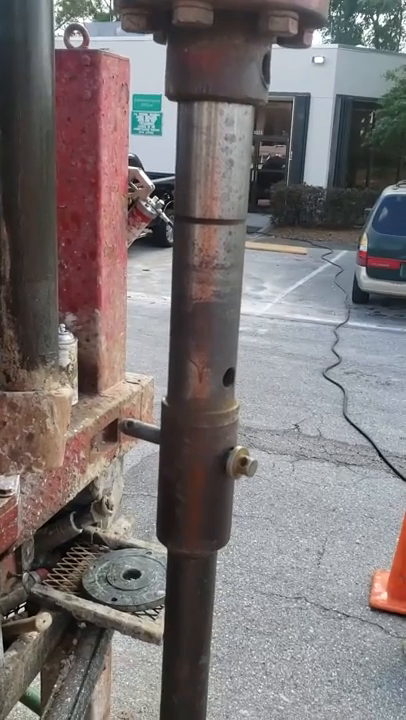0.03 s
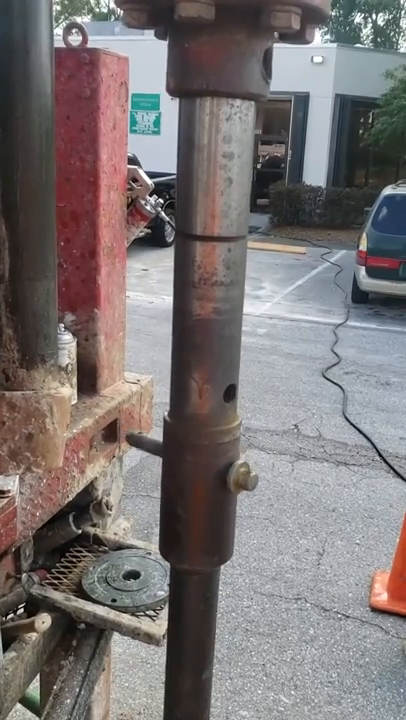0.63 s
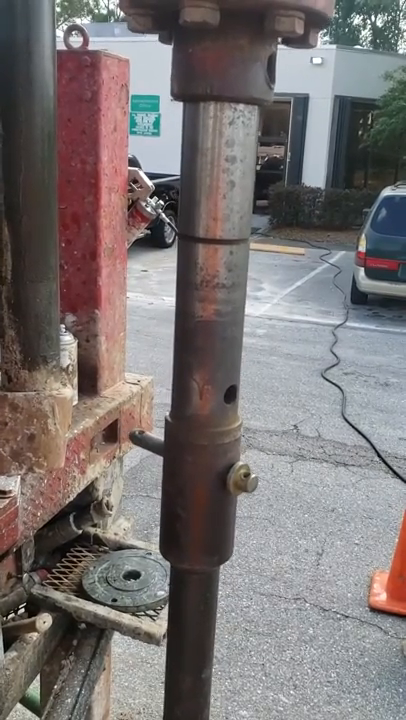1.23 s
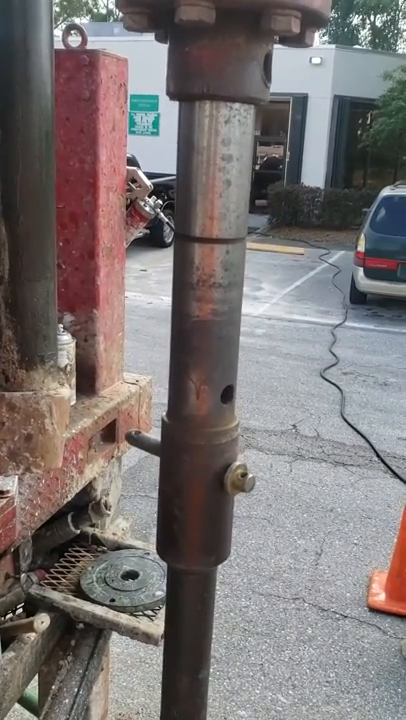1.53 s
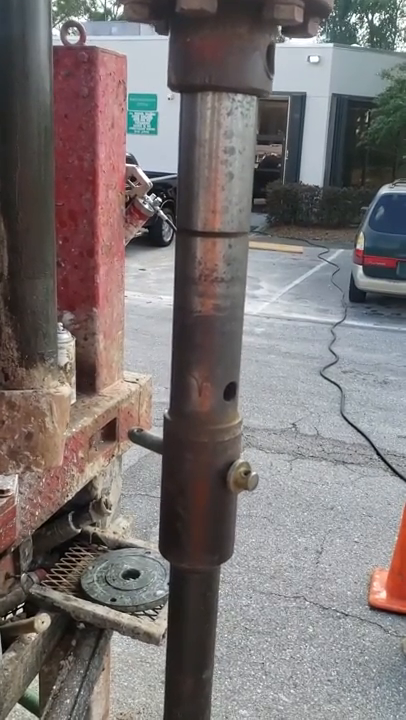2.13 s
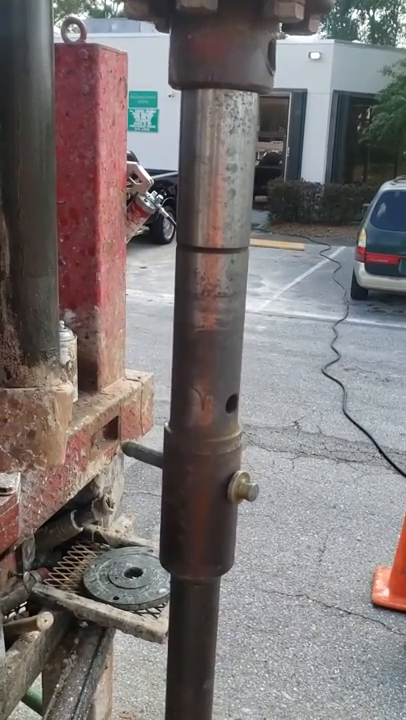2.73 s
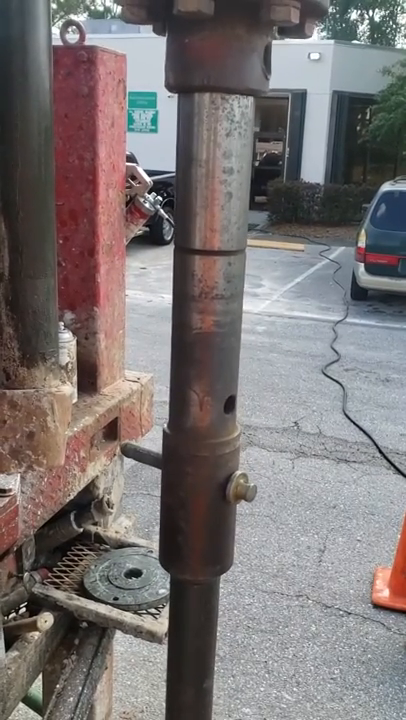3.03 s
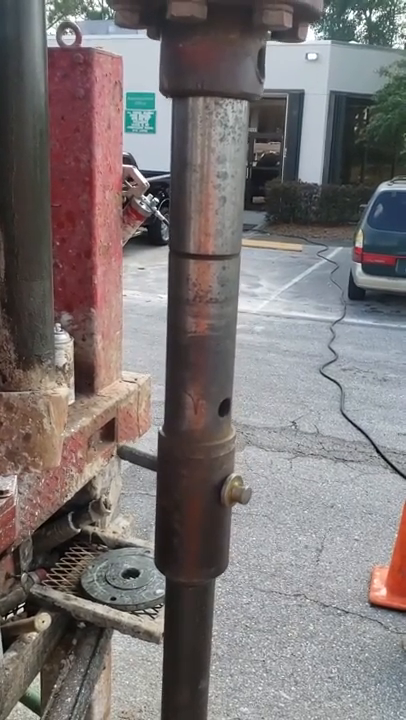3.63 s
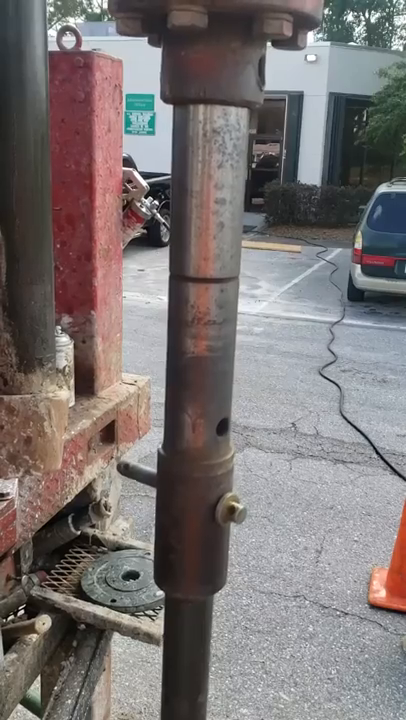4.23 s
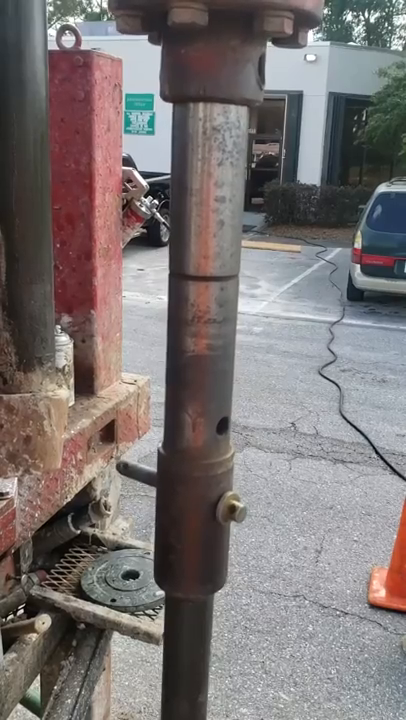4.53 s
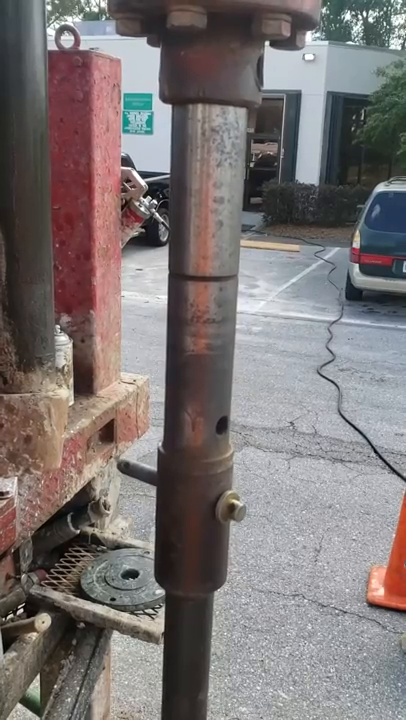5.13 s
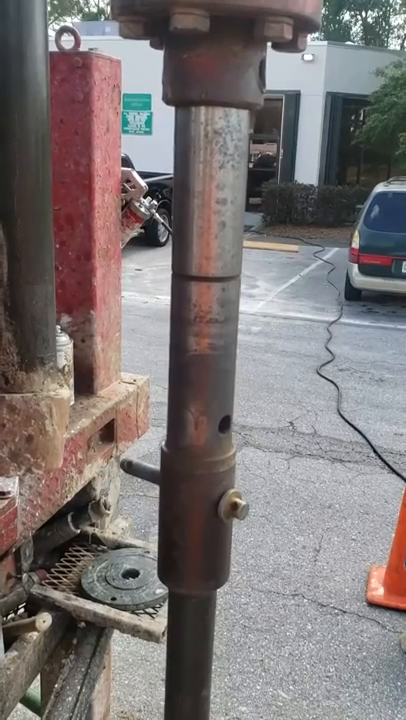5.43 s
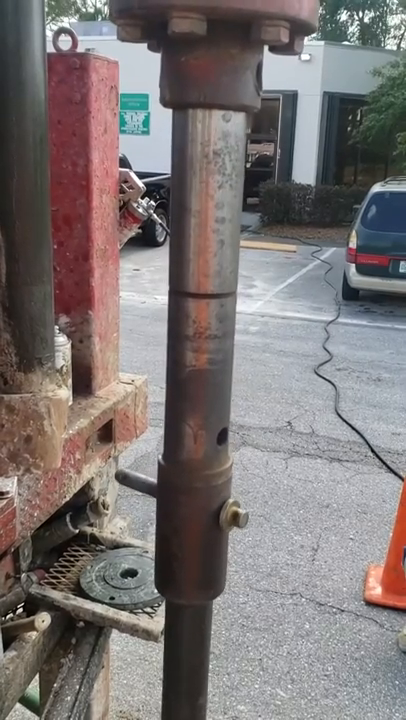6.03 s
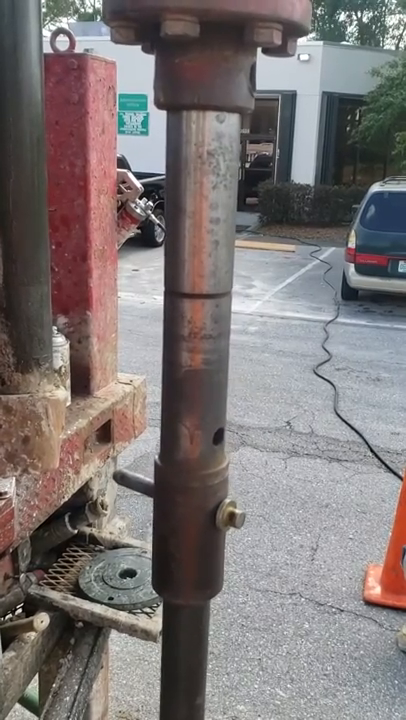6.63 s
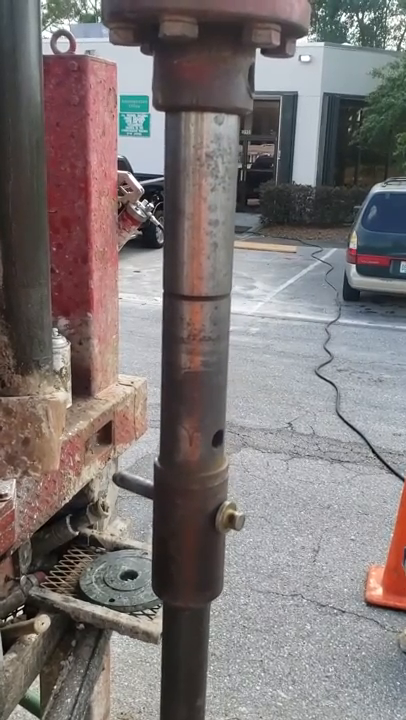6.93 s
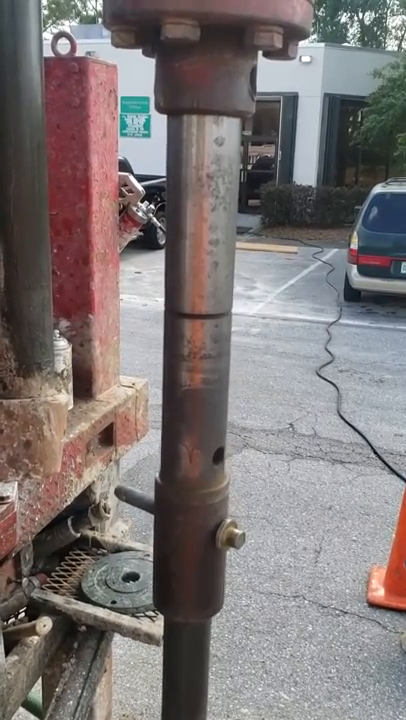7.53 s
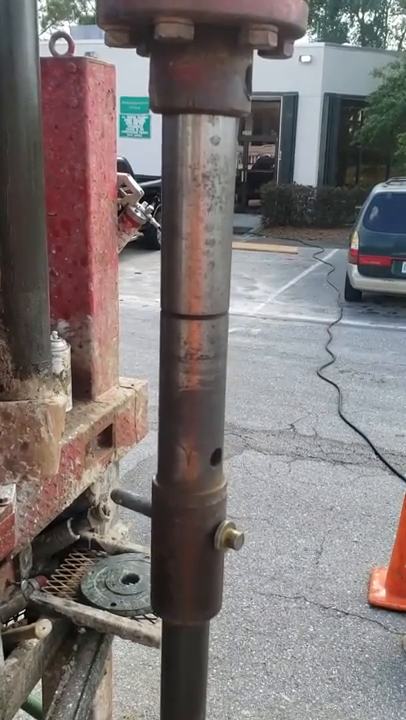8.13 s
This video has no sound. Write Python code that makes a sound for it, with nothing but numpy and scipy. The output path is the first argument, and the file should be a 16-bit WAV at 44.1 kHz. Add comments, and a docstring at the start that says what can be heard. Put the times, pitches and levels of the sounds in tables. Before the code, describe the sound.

Five loud, evenly paced hammer blows land on a steel rod, close to the microphone and to the left, each a sharp metallic clang with a thud from the ground. After every blow a chain clanks twice more softly, and a faint clunk comes before the next. The rig's engine chugs and clatters throughout in an open parking lot, swelling slightly toward each strike.

```python
"""A drop hammer on a drilling rig drives a steel rod into a parking lot: five blows, close on the left.
Each impact excites the free vibration of anvil, rod and frame, and forces a thud from the ground.
Between blows the lifting chain clanks twice, and its lug knocks into the weight to raise it again.
Underneath runs a four-cylinder engine, sagging a little in each stroke and swelling toward each blow;
its firings drive the resonances of the exhaust pipe while the block knocks and the valves clatter."""
import sys
import numpy as np
from scipy import signal
from scipy.fft import rfft, irfft, next_fast_len
from scipy.io import wavfile

SR = 44100
rng = np.random.default_rng(int(sys.argv[2]) if len(sys.argv) > 2 else 0)


def bounce(signal):
    """Save signal as a 16-bit WAV file at the path given by the first command-line argument."""
    frames = np.transpose(np.atleast_2d(signal))
    limited = np.clip(frames, -1, 1)
    pcm = np.round(limited * 32767).astype(np.int16)
    wavfile.write(sys.argv[1], SR, pcm)


N = 366030

# Levels in all tables are relative: each source applies its own gain.
# Each row: firing phase in cycles, firing level in dB, valve phase in cycles, valve level in dB.
CYLINDERS = [(.005, 3, 0.17, 1), (0.253, 6, 0.41, -2.5), (0.497, 4.5, 0.65, -5.5), (0.727, -11, 0.89, -2)]
# Exhaust resonances. Each row: frequency in Hz, bandwidth in Hz, gain in dB.
PIPE_MODES = [(47, 4.1, -15), (99, 39, -3), (137, 10.7, 7), (180, 88, -11), (211.5, 21, 9.5), (253, 16, 0),
              (399, 28, 9), (446.7, 6.1, 6.5), (560, 27, 8)]
# Exhaust tones. Each row: multiple of the engine's cycle rate, level in dB.
HUM_HARMONICS = [(4, -60), (8, -60), (12, -49.5), (15, -57), (16, -58), (20, -53), (36, -60), (40, -61)]
# The lug meets the weight. Each row: start in seconds, level in dB.
LIFTS = [(.143, -33), (1.824, -36.5), (3.505, -37), (5.187, -38), (6.857, -36)]
# Hammer blows. Each row: start in seconds, steel level in dB, ground boom in dB, ground thud in dB,
# clash hold in seconds, clash t60 in seconds, rod level in dB.
BLOWS = [(0.6478, 1, -3, 0.5, 0.018, .15, -2), (2.3284, -0.05, -1.5, 0, 0.018, .18, -0.5),
         (4, -.3, 1.5, 3.5, .012, 0.23, 8), (5.6849, 1, -2, 0.5, 0.019, 0.15, -1.5),
         (7.3584, 0.7, 3, -7, 0.019, .15, -3.5)]
# The chain strikes its casing. Each row: start in seconds, slap level in dB, rebound level in dB.
CLANKS = [(1.105, -29.5, -32.5), (2.786, -27, -31.5), (4.461, -28, -34.5), (6.139, -29, -34),
          (7.824, -33, -35)]
# Loose links. Each row: start in seconds, level in dB.
LINK_TICKS = [(.763, -38.5), (2.622, -41), (4.108, -35), (6.494, -46)]

# Normal modes of the steel parts. Each row: frequency in Hz, level in dB, t60 in seconds.
FRAME_MODES = [(214.3, 6.5, 0.26), (300, -5.5, 0.12), (364, -2.5, 0.24), (761, 2, 0.21)]
ANVIL_MODES = [(1313, -16, .17), (2314, -18, .2), (3267, -13, .17), (4583, -12, .15), (4737, -10, .19),
               (5324, -8, .14), (5394, -10, .12), (6038, -2, .13), (6254, -1, .15), (6448, -6, .14),
               (6511, -11, .17), (7603, -19, .17), (7825, -17, .17), (9081, -13, .2), (9138, -10, .16),
               (9423, -13, .13), (10963, -13, .15), (11175, -7, .14), (12750, -14, .13), (13066, -12, .13),
               (13580, -13, .14), (13633, -3, .15), (13730, -11, .13), (13863, -5, .15), (13913, -11, .15),
               (14490, -18, .2), (14967, -13, .14)]
ROD_MODES = [(785, -11, .42), (1394, -14, .44), (1480, -21, .38), (1631, -19, .36), (2700, -20, .44),
             (2810, -21, .4), (3310, -13, .28), (4177, -12, .36), (5725, -13, .28), (6651, -10, .36)]

# Noise spectra. Each row: frequency in Hz, spectral density in dB.
BLOCK_SPECTRUM = [(25, -35), (60, 1.5), (150, 7), (280, 4), (450, 7), (620, 1.5), (900, -9), (1600, -2),
                  (4000, -47)]
VALVE_SPECTRUM = [(300, -25), (650, -2), (1050, -4.5), (1550, -3.5), (1950, -8), (2450, -6.5), (2850, -12),
                  (4200, -10.5), (6550, -3.5), (7400, -15), (8500, -21.5), (9900, -8.5), (12000, -11),
                  (13500, -20), (15500, -29)]
LUG_SPECTRUM = [(120, -31), (220, 8), (380, -3.5), (600, -3), (780, -3.5), (1100, -13), (1600, -9),
                (3000, -16), (6400, -23), (8000, -25), (15000, -24)]
CLASH_SPECTRUM = [(25, -30), (60, -51), (190, -5), (260, -21), (380, -6), (520, -9.5), (1000, -2),
                  (2100, -1.5), (3000, 0.5), (4200, -2.5), (6200, 5.5), (7100, -7.5), (8300, -12.5),
                  (9200, -2), (15300, -5.5), (16000, -17)]  # steel on steel
BANG_SPECTRUM = [(100, -27), (160, 3.5), (200, 6), (280, 2.5), (360, -5.5), (520, 2.5), (900, -9),
                 (2000, -20)]  # the jolted frame
CASING_SPECTRUM = [(120, -3), (330, 10), (700, -2), (1000, -3.5), (1500, 2), (1950, -1.5), (3100, -1.5),
                   (4100, -9.5), (5500, -1), (6550, 3.5), (7400, -15), (8500, -27), (9800, -4),
                   (15500, -22)]  # chain or weight against the casing

# Stereo balance of each source. Each row: frequency in Hz, left minus right in dB.
ENGINE_PAN = [(100, 0.5), (400, -1), (700, -1), (1300, 4.5), (2400, 4.5), (4400, 6.5), (8100, 18.5),
              (15000, 5.5)]
HAMMER_PAN = [(100, 32), (400, 5.5), (2300, 6.5), (4400, 9.5), (6200, 17), (8300, 3), (9500, 10),
              (15000, 13)]
CHAIN_PAN = [(200, 0.67), (1000, 5.1), (6000, 18), (14000, 22)]
# Likeness of the two channels. Each row: frequency in Hz, correlation from -1 to 1.
ENGINE_CORRELATION = [(130, 0.99), (290, 0.8), (640, -0.31), (1400, -0.35), (3100, -0.15), (7000, 0.15)]
STEEL_CORRELATION = [(100, 1), (400, 0), (2000, 0.031)]


def amp(db):
    """Amplitude grows tenfold with every 20 dB."""
    return 10 ** (np.asarray(db) / 20)


def unit(x):
    """Normalisation to an rms of 1."""
    return x / np.sqrt(np.mean(x ** 2) + 1e-20)


def along(points, hz):
    """Interpolation of (Hz, value) points on a logarithmic frequency axis."""
    frequencies, values = np.transpose(points)
    return np.interp(np.log(hz + 1), np.log(frequencies + 1), values)


def filtered(x, response):
    """Linear filtering: the spectrum of x is multiplied by a frequency response."""
    n = x.shape[-1]
    padded = next_fast_len(n + 8192)
    return irfft(rfft(x, padded) * response(np.fft.rfftfreq(padded, 1 / SR)), padded)[..., :n]


def add(track, start, sound):
    """Superposition: a sound joins the track at start seconds."""
    part = track[:, round(start * SR):][:, :sound.shape[-1]]
    part += sound[..., :part.shape[-1]]


def coloured(pair, spectrum, pan, correlation):
    """Mid-side mixing gives two independent noises a spectrum, balance and correlation, at rms 1."""
    def mid_side(hz):
        angle = np.arccos(np.clip(along(correlation, hz), -1, 1)) / 2
        return amp(along(spectrum, hz)) * [np.cos(angle), np.sin(angle)]

    def balance(hz):
        gains = amp(along(pan, hz) * [[.5], [-.5]])
        return gains / np.linalg.norm(gains, axis=0)

    mid, side = filtered(pair, mid_side)
    return unit(filtered(np.array([mid + side, mid - side]), balance))


def stroke_times(period_s=1.678):
    """The stroke is nearly periodic: seconds since the last blow and until the next."""
    t, blows = np.arange(N) / SR, [row[0] for row in BLOWS]
    blows = np.array([blows[0] - period_s, *blows, blows[-1] + period_s])
    coming = np.searchsorted(blows, t)
    return t - blows[coming - 1], blows[coming] - t


def firing_rate(since, until, idle_hz=44.426, race_hz=.375, sag_hz=.57, sag_at_s=.66):
    """Frequency modulation: the engine races toward a blow, eases, and sags near the chain's rebound."""
    ramp = lambda s, half_width_s: np.maximum(1 - np.abs(s) / half_width_s, 0)
    race = ramp(until, .38) + ramp(since, sag_at_s)
    return idle_hz + race_hz * race - sag_hz * ramp(since - sag_at_s, .2)


def exhaust(cycle):
    """Forced resonance: one uneven puff per firing drives the pipe's modes, over a harmonic hum."""
    def pipe(f):
        modes = sum(amp(db) * 1j * f * width / (hz * hz - f * f + 1j * f * width)
                    for hz, width, db in PIPE_MODES)
        return modes / (1 + (f / 700) ** 4) / (1 + (36 / (f + 1)) ** 8)  # passes 36-700 Hz

    puffs = np.zeros(N)
    for phase, db, _, _ in CYLINDERS:
        firings = np.flatnonzero(np.diff(np.floor(cycle - phase)))
        puffs[firings] += amp(db + .8 * rng.standard_normal(128)[:len(firings)])
    hum = sum(np.sqrt(2) * amp(db) * np.cos(2 * np.pi * k * (cycle - .02)) for k, db in HUM_HARMONICS)
    return amp(-49) * unit(filtered(puffs, pipe)) + hum


def block_knocks(cycle):
    """Source and filter: the block colours random noise and a pattern that repeats every cycle."""
    patterns = rng.standard_normal((2, 512))
    repeating = np.array([np.interp(cycle, np.arange(512) / 512, p, period=1) for p in patterns])
    excitation = unit(repeating) + 4.3 * rng.standard_normal((2, N))
    return coloured(excitation, BLOCK_SPECTRUM, ENGINE_PAN, ENGINE_CORRELATION)


def valve_clatter(cycle, scatter_db=1.8):
    """Amplitude modulation: noise surges at each valve tick, in step with the camshaft."""
    ticks = np.zeros(N)
    for _, _, phase, db in CYLINDERS:
        turn, age = np.divmod(cycle - phase + 1, 1)  # age in cycles
        sizes = amp(db + scatter_db * rng.standard_normal(128))
        ticks += sizes[turn.astype(int)] * (1 - np.exp(-age / .026)) * np.exp(-age / .22)
    noise = coloured(rng.standard_normal((2, N)), VALVE_SPECTRUM, ENGINE_PAN, ENGINE_CORRELATION)
    return unit((.26 + ticks) * noise)


def engine(settle_s=.091):
    """Phase locking: one cycle times exhaust, block and valves; the last two swell toward each blow."""
    since, until = stroke_times()
    cycle = np.cumsum(firing_rate(since, until)) / SR / len(CYLINDERS) - .01
    swell = lambda rise_s: np.exp(-until / rise_s) + np.exp(-since / settle_s)
    knocks = amp(-50 + 8.5 * swell(rise_s=.56)) * block_knocks(cycle)
    clatter = amp(-43.5 + 5 * swell(rise_s=.34)) * valve_clatter(cycle)
    return exhaust(cycle) + knocks + clatter


def steel_noise(t, spectrum, pan):
    """Modal overlap: the crowded modes of nearby steel merge into coloured noise."""
    return coloured(rng.standard_normal((2, len(t))), spectrum, pan, STEEL_CORRELATION)


def chatter(t, hold_s, t60, rough_db):
    """Damping: an envelope holds, then decays exponentially; random rebounds roughen it by rough_db."""
    knots = np.arange(0, 1, .003)
    rebounds = np.interp(t, knots, rng.standard_normal(len(knots)))
    fade_db = -60 * np.maximum(t - hold_s, 0) / t60
    return amp(fade_db + rough_db * rebounds)


def ring(modes, t, hold_s, attack_s, pan_db):
    """Free vibration: modes build up, then decay after hold_s; tuning and strength vary by contact."""
    hz, db, t60 = np.transpose(modes)
    hz = hz + 7 * rng.standard_normal(len(hz))
    strength = amp(db + rng.normal(0, 2, len(hz))) * amp([[pan_db / 2], [-pan_db / 2]])
    phase = rng.uniform(0, 2 * np.pi, strength.shape)
    angle = 2 * np.pi * np.outer(hz, t)
    fade = amp(-60 * np.outer(1 / t60, np.maximum(t - hold_s, 0)))
    sines = (strength * np.cos(phase)) @ (fade * np.sin(angle))
    cosines = (strength * np.sin(phase)) @ (fade * np.cos(angle))
    return (sines + cosines) * (1 - np.exp(-t / attack_s))


def lug():
    """Impact excitation: the lug takes up the weight with a dull clunk that rings the frame."""
    out, t = np.zeros((2, N)), np.arange(SR // 4) / SR
    for start, db in LIFTS:
        clunk = steel_noise(t, LUG_SPECTRUM, CHAIN_PAN) * chatter(t, hold_s=.012, t60=.15, rough_db=2.5)
        clunk *= 1 - np.exp(-t / .0016)
        frame = amp(-6) * ring(FRAME_MODES, t, hold_s=.025, attack_s=.009, pan_db=2)
        add(out, start, amp(db) * (clunk + frame))
    return out


def hammer():
    """Momentum transfer: the weight, let go with a soft bump, slides down and strikes the anvil."""
    out, t = np.zeros((2, N)), np.arange(SR // 2) / SR
    casing = rng.standard_normal((2, len(t)))  # the casing's dense modes, alike at every blow
    release_bump = amp(-43) * np.sin(2 * np.pi * 76 * t) * np.exp(-((t - .025) / .022) ** 2)
    for start, steel_db, boom_db, thud_db, hold_s, t60, rod_db in BLOWS:
        excitation = casing + 1.05 * rng.standard_normal(casing.shape)
        clash = amp(-13) * coloured(excitation, CLASH_SPECTRUM, HAMMER_PAN, STEEL_CORRELATION)
        clash *= chatter(t, hold_s, t60, rough_db=0) * (1 - np.exp(-t / .000059))
        bang = amp(-21.5) * steel_noise(t, BANG_SPECTRUM, HAMMER_PAN)
        bang *= chatter(t, hold_s=.02, t60=.043, rough_db=-2.5)
        anvil = amp(-24.3) * ring(ANVIL_MODES, t, hold_s=.036, attack_s=.013, pan_db=11)
        rod = amp(rod_db - 24.5) * ring(ROD_MODES, t, hold_s=.022, attack_s=.006, pan_db=8)
        thud = amp([[-24.5], [-36.5]]) * ground(t, boom_db, thud_db)  # left, right
        slide = amp(-42.5) * steel_noise(t, CASING_SPECTRUM, HAMMER_PAN)
        slide *= np.exp(-t[::-1] / .074)  # grows with the falling speed
        add(out, start - len(t) / SR, slide)
        add(out, start - .115, release_bump)
        add(out, start, amp(steel_db) * (clash + bang + anvil + rod) + thud)
    return out


def ground(t, boom_db, thud_db):
    """Heavy damping: the ground answers a blow with only a few low cycles."""
    push = amp(boom_db) * np.cos(2 * np.pi * 56 * t) + amp(thud_db) * np.cos(2 * np.pi * 100 * t)
    envelope = (1 - np.exp(-t / .00037)) * np.exp(-(t / .035) ** 4)
    return signal.sosfilt(signal.butter(4, 38, "highpass", fs=SR, output="sos"), push * envelope)


def clank(frame_db, hold_s):
    """Mechanical coupling: one slap of the chain on its casing also rings frame, rod and anvil."""
    t = np.arange(SR // 4) / SR
    slap = steel_noise(t, CASING_SPECTRUM, CHAIN_PAN) * chatter(t, hold_s, t60=.14, rough_db=3.5)
    slap *= 1 - np.exp(-t / .00036)
    frame = amp(frame_db) * ring(FRAME_MODES, t, hold_s=.0023, attack_s=.009, pan_db=3)
    rod = amp(-8) * ring(ROD_MODES, t, hold_s=.003, attack_s=.003, pan_db=7) * np.exp(-t / .08)
    anvil = amp(-15) * ring(ANVIL_MODES, t, hold_s=.006, attack_s=.003, pan_db=9)
    return amp(1) * (slap + frame + rod + anvil)


def chain(bump_lead_s=.0185, rebound_s=.243):
    """Repeated collision: the slack chain bumps, slaps and rebounds in each stroke; loose links tick."""
    out = np.zeros((2, N))
    for start, slap_db, rebound_db in CLANKS:
        add(out, start - bump_lead_s, amp(-38.5) * clank(frame_db=-6.5, hold_s=.0082))
        add(out, start, amp(slap_db) * clank(frame_db=-15, hold_s=.0089))
        add(out, start + rebound_s, amp(rebound_db) * clank(frame_db=-4, hold_s=.019))
    for start, db in LINK_TICKS:
        add(out, start, amp(db) * clank(frame_db=-24.5, hold_s=.0017))
    return out


def yard(x, t60):
    """Reverberation: reflections from walls and parked cars merge into a dull, decaying tail."""
    t = np.arange(SR) / SR
    colour = lambda hz: amp(along([(100, -4), (800, -22), (4000, -3), (12000, -14)], hz))
    tail = filtered(rng.standard_normal((2, SR)), colour)
    tail *= amp(-60 * t / t60) * (1 - np.exp(-t / .02))
    return signal.fftconvolve(x.mean(0)[None], tail / np.linalg.norm(tail[0]), axes=1)[:, :N]


def scene():
    """Superposition: the struck steel and its weak reflections add to the engine."""
    steel = hammer() + chain() + lug()
    return steel + amp(-37) * yard(steel, t60=.6) + engine()


def record(dry, ceiling=.95, top_hz=15900):
    """Saturation and band limiting: the phone rounds the highest peaks and cuts the top treble."""
    rounded = dry / (1 + np.abs(dry / ceiling) ** 6) ** (1 / 6)
    return filtered(rounded, lambda hz: 1 / (1 + (hz / top_hz) ** 120))


dry = scene()
out = record(dry)
bounce(out)
```